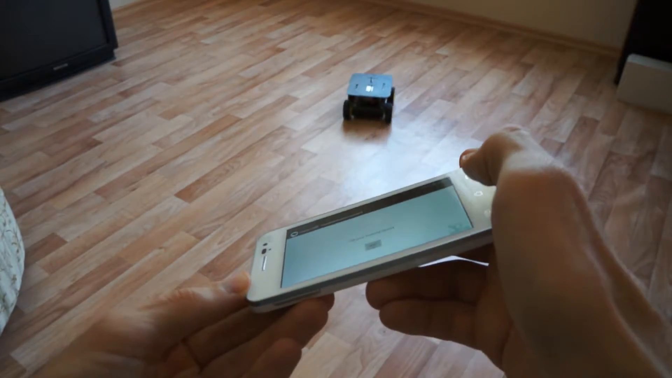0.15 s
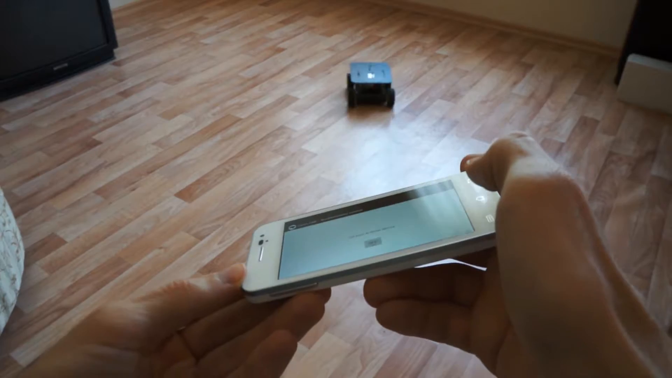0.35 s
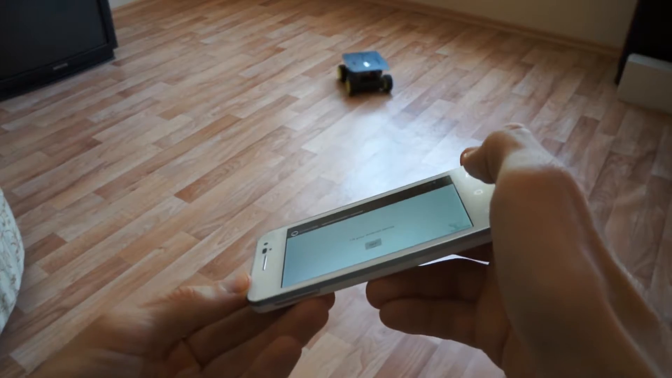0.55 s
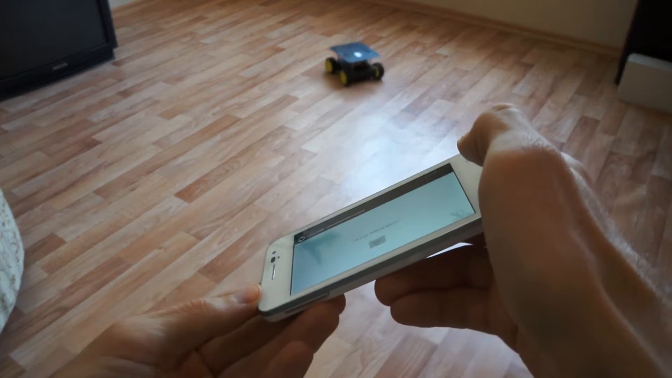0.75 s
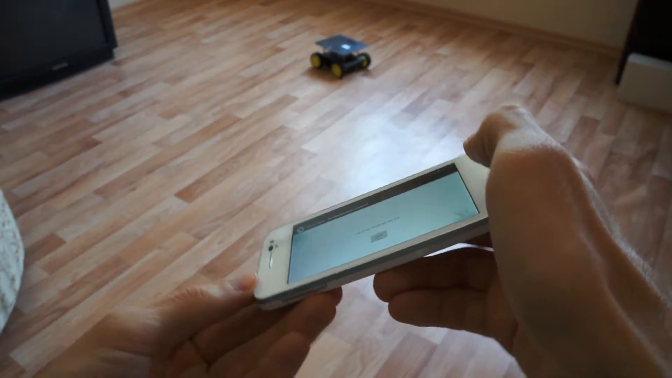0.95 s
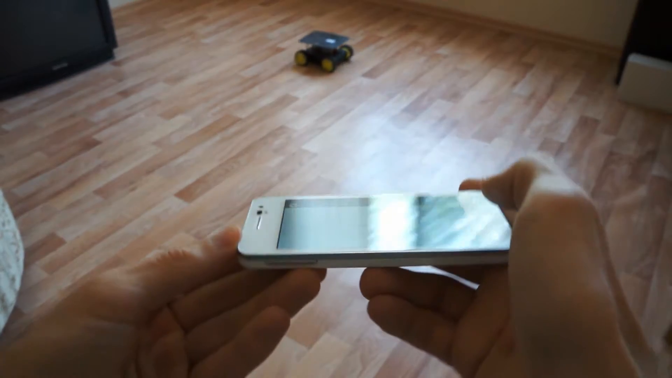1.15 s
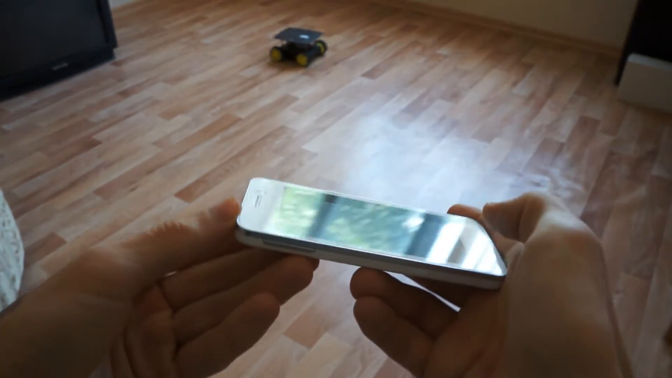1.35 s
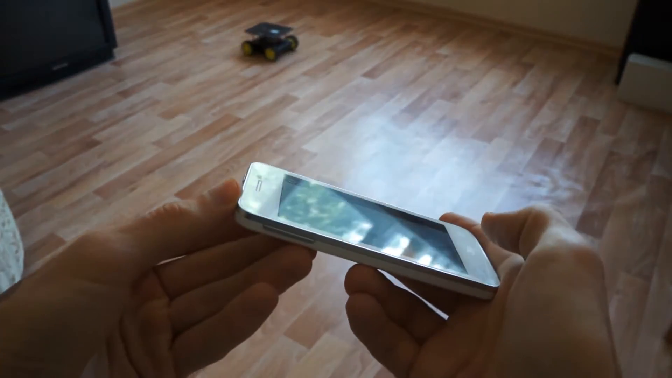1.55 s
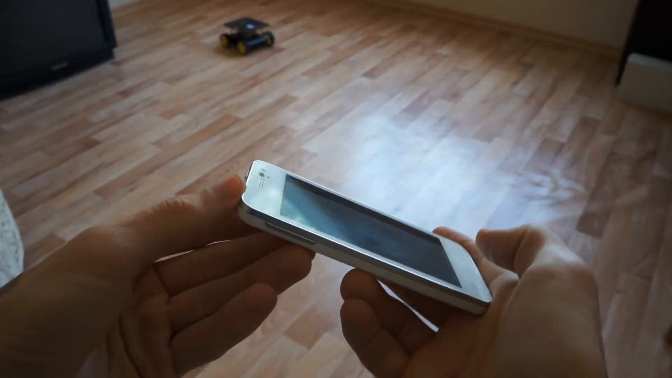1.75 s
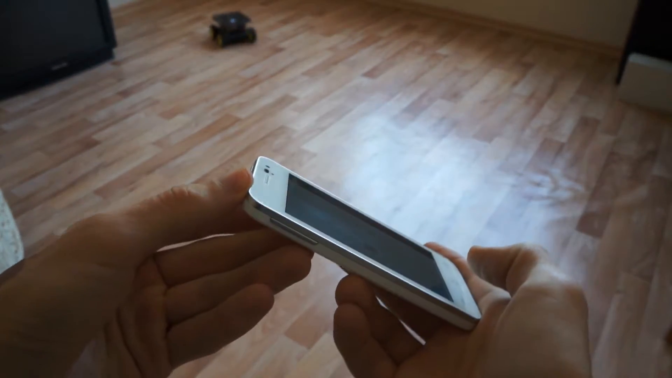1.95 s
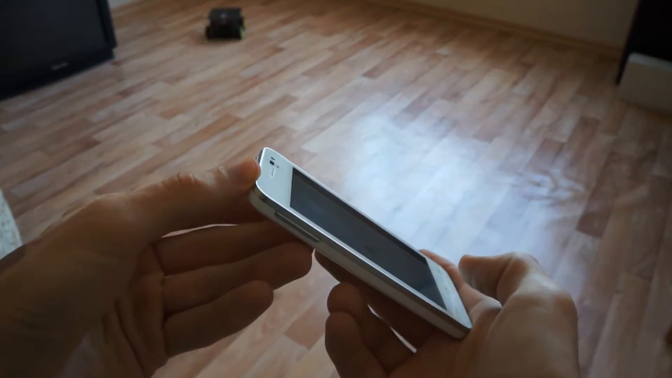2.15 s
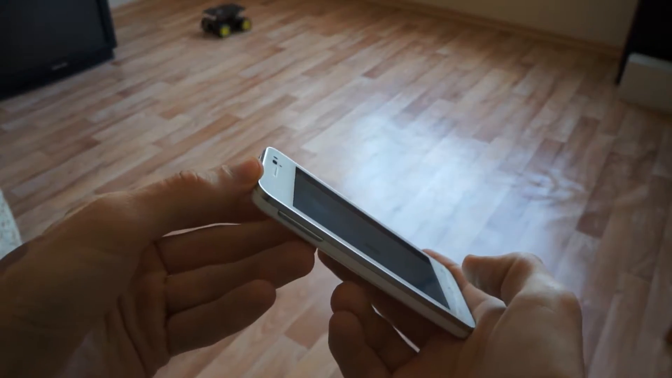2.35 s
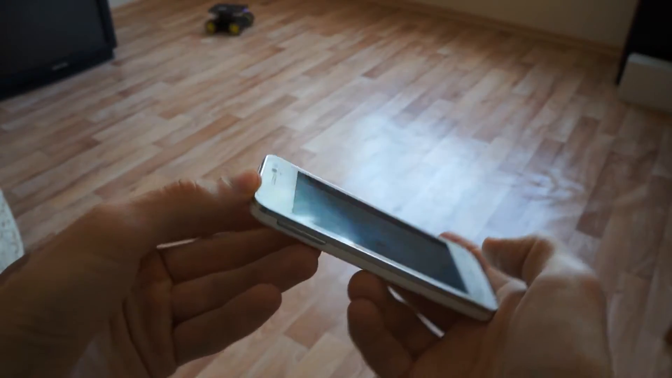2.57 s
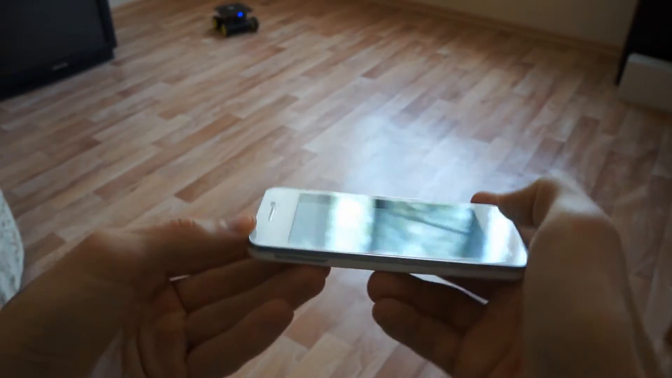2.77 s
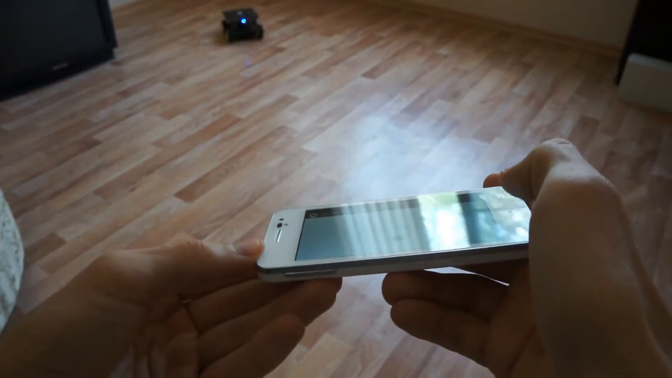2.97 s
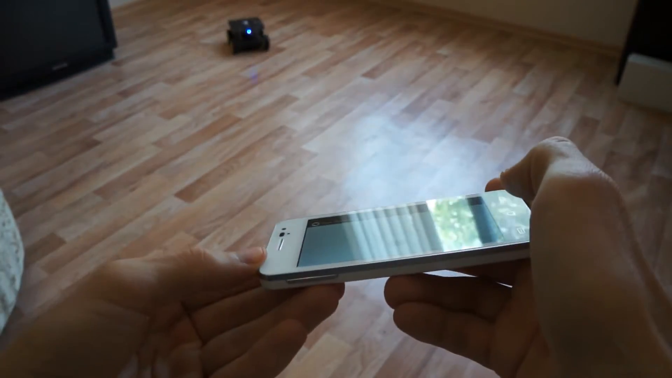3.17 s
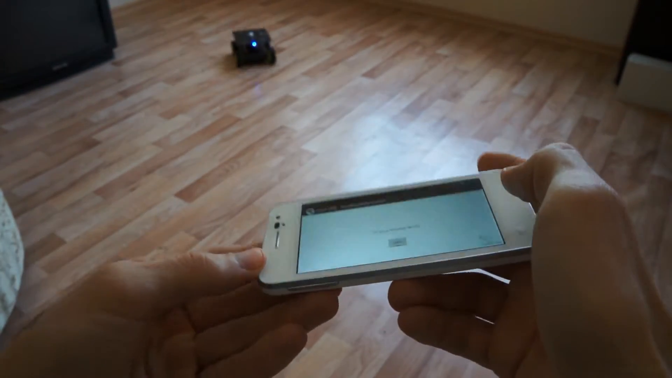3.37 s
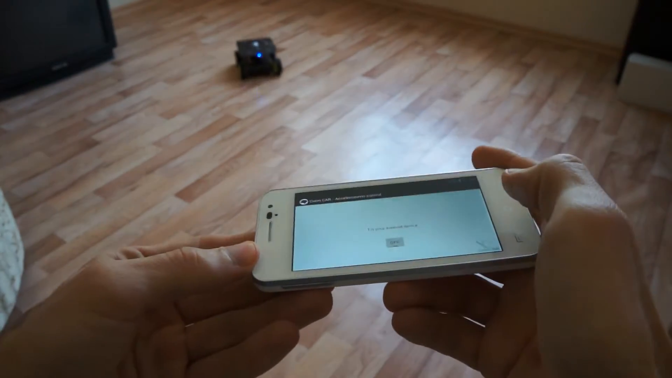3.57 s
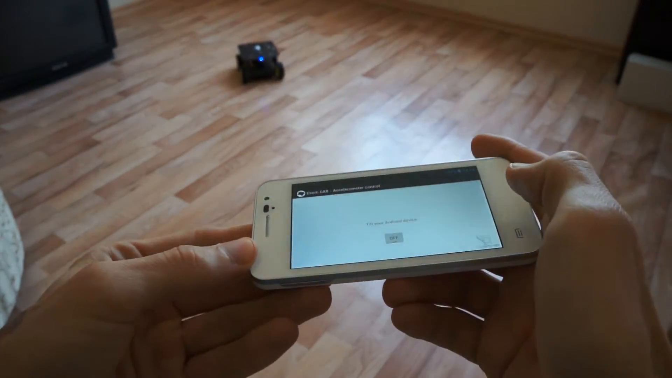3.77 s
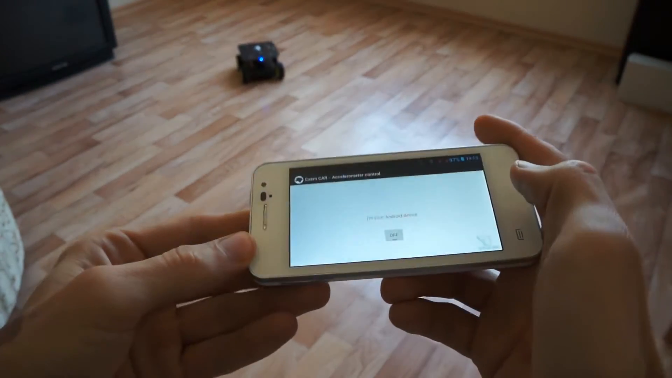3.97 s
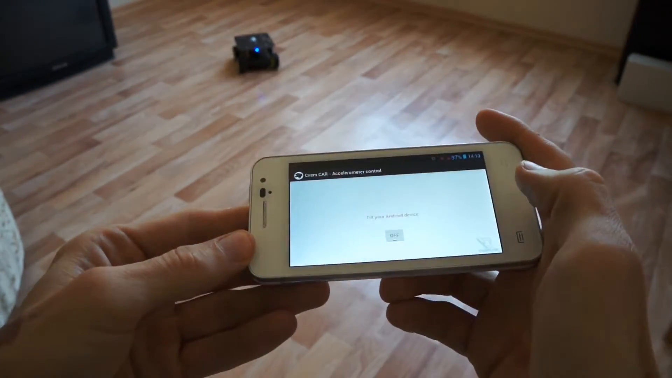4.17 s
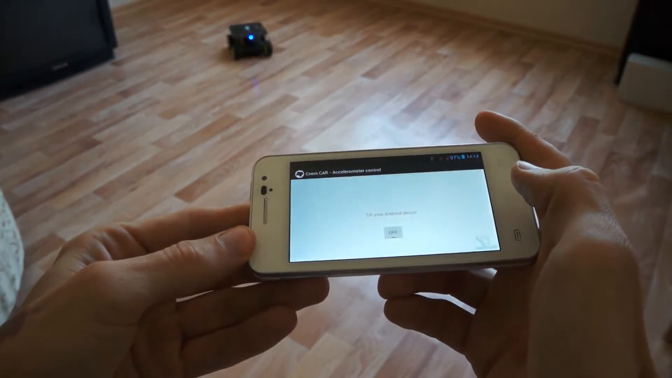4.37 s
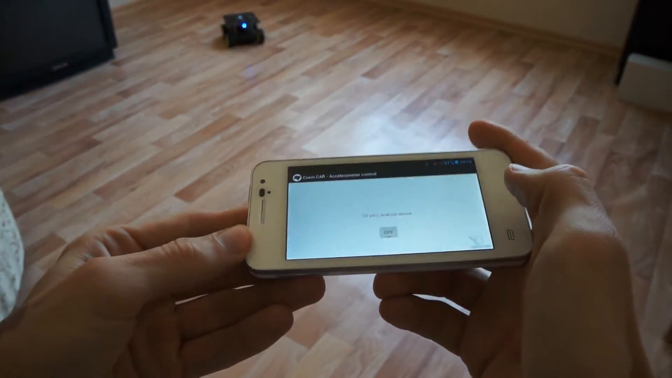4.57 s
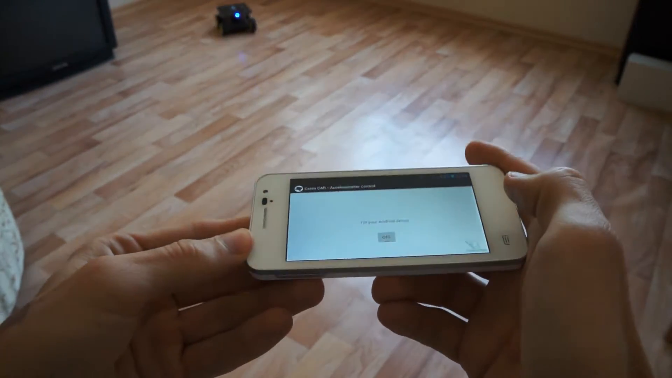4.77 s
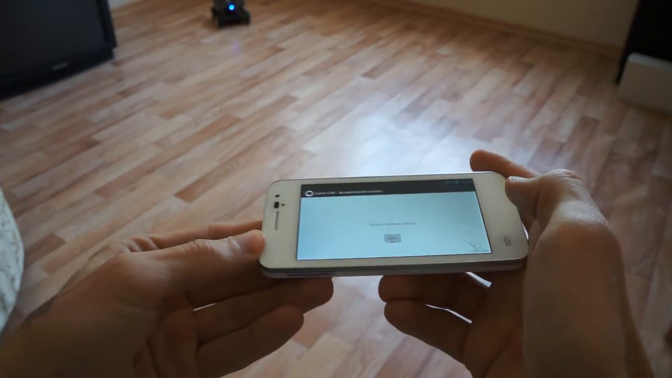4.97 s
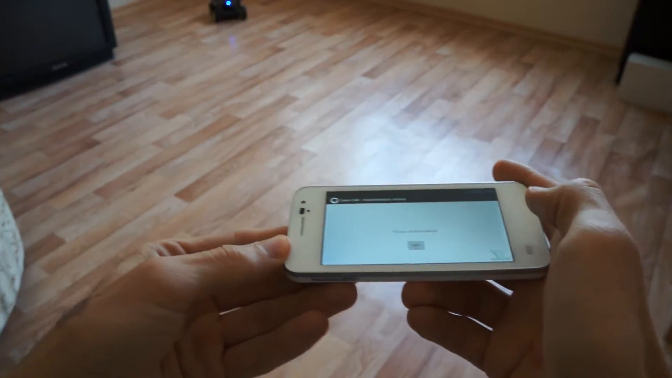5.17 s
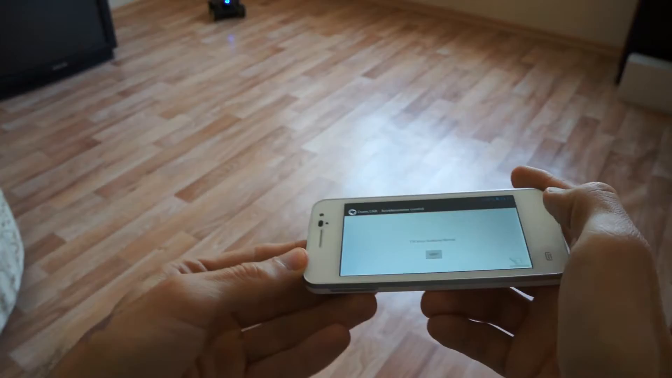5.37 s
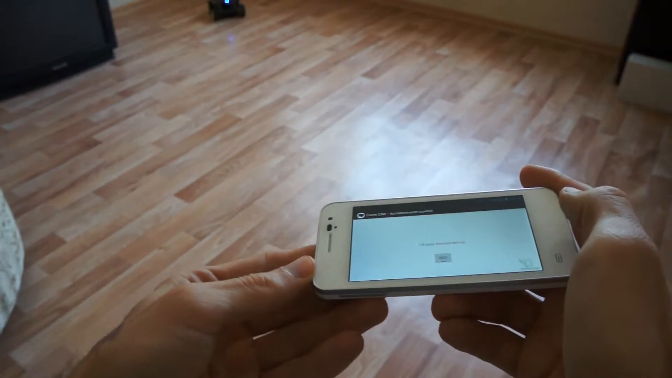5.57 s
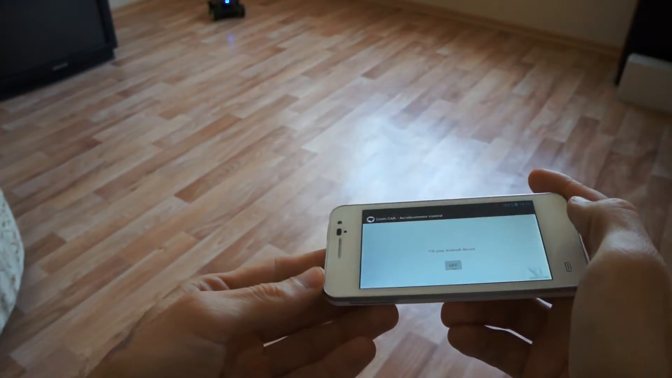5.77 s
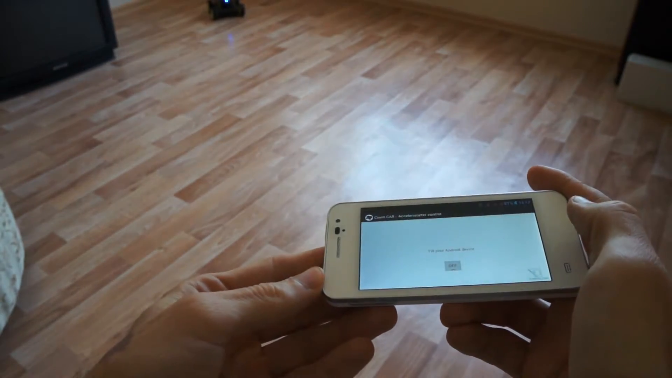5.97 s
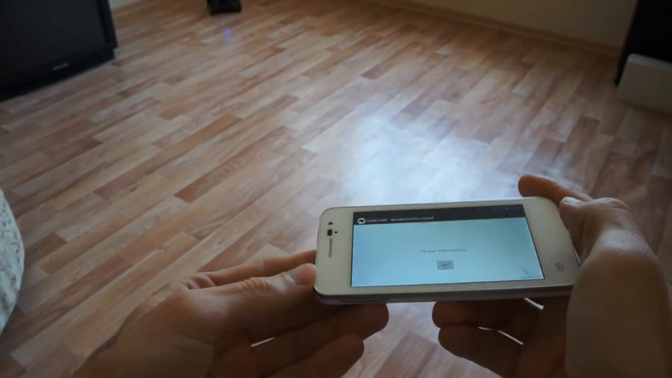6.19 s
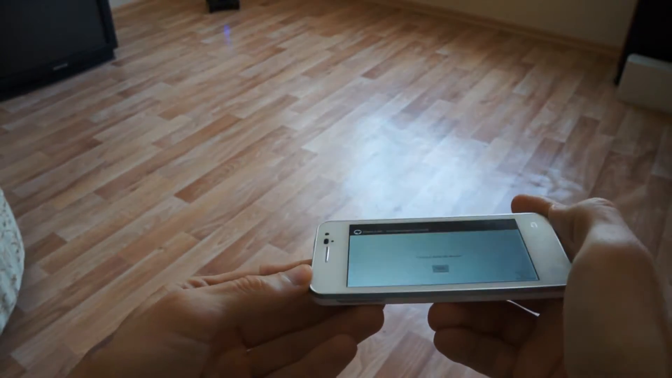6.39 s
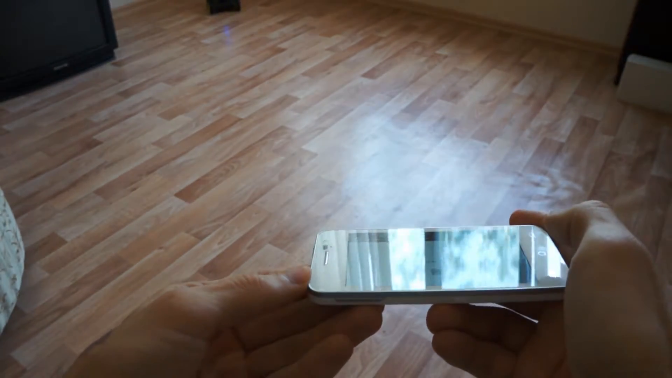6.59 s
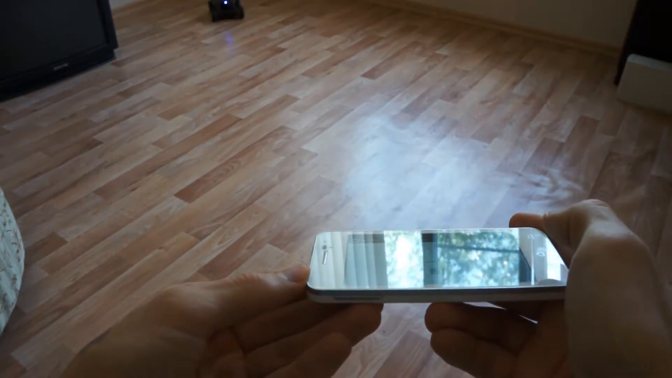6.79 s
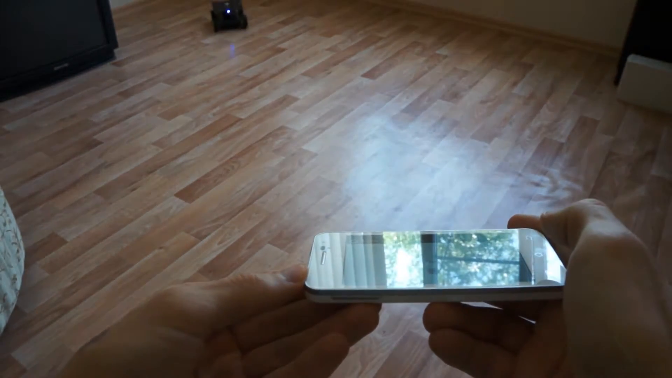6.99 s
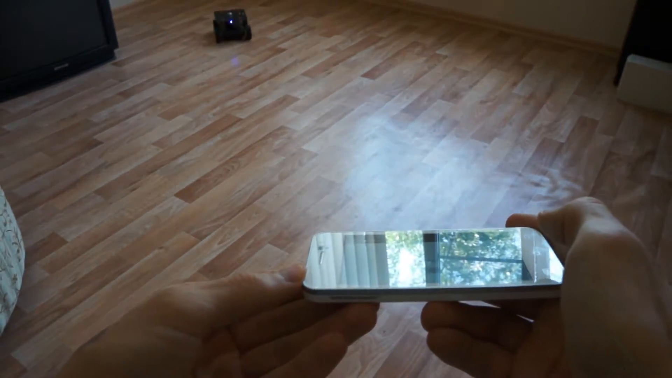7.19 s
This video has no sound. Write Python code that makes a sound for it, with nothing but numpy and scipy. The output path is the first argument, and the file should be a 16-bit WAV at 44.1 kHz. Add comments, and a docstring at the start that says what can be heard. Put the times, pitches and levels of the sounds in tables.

```python
"""A toy car with four small gear motors drives over a hard floor in a quiet room. From the start
each gearbox hums at its tooth-meshing rate, loose plastic gears rattle the resonant chassis and
the wheels rumble. The car stops near 3.5 s, runs again from 4 s and stops once more after 5 s.
Just before 6 s it jolts into motion, and from 6.6 s to the end it is back at full speed.
Throughout, hum and rattle reach two microphone ports directly and as reverberation, over a hush."""
import sys
import numpy as np
from scipy import signal
from scipy.fft import rfft, irfft, next_fast_len
from scipy.io import wavfile
from scipy.ndimage import uniform_filter1d, map_coordinates

SR = 44100
rng = np.random.default_rng(int(sys.argv[2]) if len(sys.argv) > 2 else 0)


def dump_mix(stems):
    """Bounce the given channels to the path in sys.argv[1] as a 16-bit WAV at rate SR."""
    frames = np.atleast_2d(stems).T  # one column per channel
    limited = np.clip(frames, -1, 1)  # hard clip at full scale
    pcm = np.round(limited * 32767).astype(np.int16)
    wavfile.write(sys.argv[1], SR, pcm)


N = 319284


def rattle(level_db, bright_db, clicks_per_s=9000.):
    """Impact excitation: random tooth clicks ring the chassis, louder and brighter at speed."""
    size_db = 3.0 * np.minimum(rng.exponential(1, N), 2.2)
    clicks = (rng.random(N) < clicks_per_s / SR) * rng.choice([-1., 1.], N) * gain_of(size_db)
    pace = np.clip((level_db + 42.0) / 16, 0, 1)  # 0 at a crawl, 1 at full speed
    fast, slow = (unit_rms(filtered(clicks, lambda hz: chassis(hz, p))) for p in (1, 0))
    radiated = directivity(pace * fast + (1 - pace) * slow)
    treble = filtered(radiated, lambda hz: 1 / (1 + (3000 / (hz + 1)) ** 6))
    low_gain = np.sqrt(np.clip(1 - gain_of(2 * bright_db), .02, 1))
    balanced = gain_of(bright_db) * unit_rms(treble) + low_gain * unit_rms(radiated - treble)
    return balanced * gain_of(level_db)


def chassis(hz, pace):
    """Modal resonance: the plastic body's peaks and hollows set the rattle's gain at each frequency."""
    # broad spectrum of the rattle: f/Hz, relative level/dB
    spectrum = [(130, -59), (300, -29), (620, -19.5), (720, -13), (2400, -1.5), (3500, -2), (9000, -2),
                (10500, -10.5), (12300, -21), (13000, -28), (13600, -24.5), (15000, -40.5)]
    # modes (hollows if negative): f/Hz, width/Hz, level at full speed/dB, level at a crawl/dB
    modes = [(654, 120, -4.5, -0.5), (918.5, 112, 11.5, 10.5), (1167, 340, 4, 14), (1483, 210, 7, 10),
             (1900, 260, 5, 6.5), (2405, 210, -4, 3), (2645, 42, 2, 10), (3480, 330, -2.5, 1),
             (4370, 710, 5.5, 4), (4850, 280, 1, 1), (5280, 280, -2.5, -2.5), (5790, 400, 1.5, 11),
             (6870, 1400, -2, 6), (8000, 1000, 3, 5)]
    modes_db = sum((pace * fast + (1 - pace) * slow) / (1 + (2 * (hz - f) / width) ** 2)
                   for f, width, fast, slow in modes)
    return gain_of(at_frequency(spectrum, hz) + modes_db)


def directivity(x, patchy_db=2.6, middle_hz=2300, width_hz=1800):
    """Directional radiation: as the car turns, patches of its spectrum swell and fade."""
    # the middle band thins as the car faces away: t/s, level/dB
    thinning = [(1.2, 0), (1.9, -2.5), (2.7, -1.5), (3.6, 0)]
    hz, t, spectra = signal.stft(x, SR, nperseg=512)
    middle = 1 / (1 + (2 * (hz - middle_hz) / width_hz) ** 4)
    spectra = spectra * gain_of(np.outer(middle, at_time(thinning, t)))
    patches = rng.standard_normal(spectra.shape[::-1]).T
    patches = uniform_filter1d(patches, size=2, axis=0)
    patches = uniform_filter1d(patches, size=14, axis=1)
    return signal.istft(spectra * gain_of(patchy_db * unit_rms(patches)), nperseg=512)[1][:N]


def drive(start_db=-19.5, trail_s=0.049, jolt_s=5.845, jolt_fade_s=0.017):
    """Critically damped step response: the throttle sets the rattle's level and treble share, in dB."""
    # throttle moves: t/s, target level/dB, time constant/s
    throttle = [(0, -22, 0.2), (0.52, -20, 0.091), (0.82, -24.5, 0.17), (1.12, -19.5, 0.046),
                (3.491, -44, 0.12), (3.85, -42.5, 0.12), (3.964, -29, 0.009), (4.041, -19, 0.035),
                (4.85, -30, 0.15), (5.06, -47, 0.15), (5.45, -70.5, 0.072), (5.843, -52.5, 0.0016),
                (5.858, -40.5, 0.017), (5.965, -31.5, .012), (6.1, -27, 0.015), (6.21, -36.5, 0.095),
                (6.42, -43.5, 0.037), (6.5, -30.5, 0.015), (6.57, -19, 0.037)]
    t = np.arange(N) / SR
    aims_db = [start_db] + [row[1] for row in throttle]
    level_db = np.full(N, start_db)
    for (s, aim_db, lag_s), before_db in zip(throttle, aims_db):
        u = np.maximum(t - s, 0) / lag_s
        level_db = level_db + (aim_db - before_db) * (1 - (1 + u) * np.exp(-u))
    # brightness trails the level; a jolt from standstill is briefly bright
    pole = np.exp(-1 / (trail_s * SR))
    trailing_db = signal.lfilter([1 - pole], [1, -pole], level_db - start_db)
    jolt_db = 15 * (t > jolt_s) * np.exp(-np.abs(t - jolt_s) / jolt_fade_s)
    return level_db, np.minimum(-0.62 + 0.1738 * trailing_db + jolt_db, -.3)


def motors(rattle_db):
    """Superposition: the hums of the separate motor runs add, each at its own tooth rate."""
    # one list per run of a motor: t/s, tooth rate f/Hz, fundamental level/dB, octave level/dB
    runs = [
        [(0.0, 405, -43, -49), (0.3, 440.4, -57.5, -52), (0.5, 427, -50, -62), (0.8, 447.8, -56.5, -36),
         (1.13, 405.5, -49, -62), (1.33, 416, -46, -60), (1.39, 447.8, -41.5, -35), (1.6, 463.8, -41, -33.5),
         (1.85, 476.5, -53, -31), (2.0, 472.6, -51, -40), (2.17, 461.8, -41, -31), (2.4, 459, -51, -25.5),
         (2.6, 464.8, -42, -31.5), (2.88, 449, -33.5, -26.5), (2.97, 437.5, -41.5, -37),
         (3.15, 455, -42.5, -39), (3.33, 467, -70, -43), (3.45, 453.2, -46.5, -54), (3.6, 398, -56, -49)],
        [(1.4, 479, -53, -45), (1.6, 495, -48, -40), (1.9, 491, -46, -60), (2.05, 508, -40.5, -43),
         (2.22, 502.5, -40, -40), (2.31, 495, -63, -42), (2.5, 490.5, -42, -40), (2.72, 509.4, -47, -44),
         (3.05, 488, -47, -56), (3.4, 485, -51, -45)],
        [(0.0, 380.5, -43, -44), (0.16, 371, -46.5, -47), (0.45, 347.3, -55, -61), (0.54, 361, -45, -59),
         (0.65, 366.5, -47, -59), (1.05, 355.5, -53, -51), (1.45, 365, -48, -56), (1.65, 341, -59, -76),
         (1.8, 302, -69, -67)],
        [(2.9, 320.5, -60, -59), (3.1, 377.4, -50, -55), (3.3, 392, -57, -62), (3.5, 386, -49.5, -58),
         (3.64, 349.7, -61, -52)],
        [(4.09, 348, -60.5, -70), (4.17, 396, -55, -64), (4.3, 449.4, -45, -36), (4.42, 470.3, -43, -52),
         (4.65, 480, -47, -57), (4.8, 471.3, -46.5, -43), (4.91, 407.7, -39.5, -46),
         (5.02, 405.3, -52.5, -52.5), (5.09, 427, -51, -48), (5.14, 406, -67, -60)],
        [(4.1, 324, -56, -67), (4.2, 361, -53.5, -61), (4.3, 398, -44, -63), (4.5, 405.5, -42.5, -62),
         (4.7, 400.5, -43, -53), (4.9, 362.2, -49.5, -55), (5.13, 323.4, -59, -64)],
        [(6.6, 311.3, -94, -58), (6.7, 377.8, -46.5, -46), (6.9, 469, -44, -33.5), (7.05, 481, -41.5, -34),
         (7.3, 489, -40, -46)],
        [(6.8, 468, -55, -53), (7.0, 507, -45, -60), (7.3, 512.6, -53, -56)],
        [(6.7, 355.3, -48, -47), (6.9, 373.6, -49.5, -56.5), (7.3, 364.4, -55, -73)],
        [(0, 307, -50, -68), (.25, 284, -59, -70)],
    ]
    # lift of the third harmonic in each run: level/dB
    third_lifts = [-3.5, -4, -13, -10.5, 1.5, -6, 0, -10, -20, 1]
    hum = np.zeros(N)
    for run, lift_db in zip(runs, third_lifts):
        add(hum, run[0][0], gearbox(run, rattle_db, lift_db))
    return hum


def gearbox(run, rattle_db, lift_db, waver_hz=.9, flutter_db=2.2, slip_rad=.11, knock_slip_rad=.6):
    """Periodic tooth meshing gives harmonics; each flutters, and tooth errors modulate its phase."""
    # third harmonic: f/Hz, level re rattle/dB
    third_spectrum = [(900, -24), (1100, -25), (1250, -21), (1400, -15), (1530, -17)]
    # its swell as the car turns under load: t/s, level/dB
    third_swell = [(0, 1), (1.3, 3.5), (1.55, 1.5), (1.9, 1), (2.1, -1.5), (2.35, 6.5), (2.55, -15),
                   (2.76, 8.5), (3.05, 5), (3.25, -0.5), (3.42, 3.5), (3.5, 7), (4.15, 7), (4.35, -11),
                   (4.52, 4), (4.7, -1.5), (4.85, 3), (5.0, -3.5), (6.75, 4), (6.95, -1), (7.2, 1)]
    # tooth knocks, strongest in steady circling: t/s, level re rattle/dB
    knocks = [(0, -1), (1.4, -3), (1.7, 1.5), (2.8, 1.5), (3.1, -3), (4.7, -3), (7.2, -2)]
    # their high harmonics: multiple of the tooth rate, level re knocks/dB
    upper_orders = [(4, -24), (5, -27), (6, -22), (8, -18), (9, -21), (10, -17.5), (12, -18), (14, -24),
                    (16, -18), (18, -20)]
    times, *columns = np.transpose(run)
    t = np.arange(times[0], times[-1], 1 / SR)
    hz, fundamental_db, octave_db = (np.interp(t, times, column) for column in columns)
    phase = 2 * np.pi * np.cumsum(hz + waver_hz * drift(len(t), 25.)) / SR
    rattle_db = rattle_db[np.minimum(np.round(t * SR).astype(int), N - 1)]
    glide_hz_per_s = uniform_filter1d(np.gradient(hz) * SR, size=2000)
    strain_db = 3 * np.minimum(abs(glide_hz_per_s) / 500, 1)  # sings out in fast changes of speed
    third_db = rattle_db + lift_db + strain_db
    third_db += at_frequency(third_spectrum, 3 * hz) + at_time(third_swell, t)
    # the teeth knock hard only near full speed
    knock_db = rattle_db + at_time(knocks, t) - .06 * np.maximum(460 - hz, 0)
    orders = [(1, fundamental_db), (2, octave_db), (3, third_db)]
    orders += [(k, knock_db + db) for k, db in upper_orders]
    hum = np.zeros(len(t))
    for k, db in orders:
        amplitude = gain_of(db + flutter_db * drift(len(t), 28.))
        depth_rad = slip_rad * k ** 2 if k <= 3 else knock_slip_rad
        hum += amplitude * np.sin(k * phase + 2 * np.pi * rng.random() + depth_rad * drift(len(t), 45.))
    since_start = t - t[0] + (t[0] == 0)  # a motor already running at t = 0 has no fade-in
    until_end = min(t[-1], N / SR) - t
    fade = np.clip(np.minimum(since_start, until_end) / .03, 0, 1)
    return np.sqrt(2) * hum * fade


def body_rings(rattle_db):
    """Narrow-band resonance: single parts of the body ring out as noise bands that swell and fade."""
    # peak t/s, half duration/s, f/Hz, level re rattle/dB
    rings = [(0.3, 0.99, 4360, -11.5), (0.789, 0.41, 1764, -16), (.82, 0.18, 904, -14),
             (1.498, 0.34, 4230, -8.5), (.97, 0.14, 2900, -14), (1.25, .1, 6700, -14),
             (1.85, 0.25, 4260, -12), (2.144, 0.083, 9000, -19), (3.15, 0.59, 4850, -11),
             (3.35, 0.44, 4320, -15), (3.54, 0.098, 1219, -13.5), (4.062, .05, 1510, -13),
             (4.084, 0.062, 1130, -14), (4.142, 0.054, 910, -16), (4.16, .05, 1493, -11.5),
             (4.166, 0.073, 2610, -14), (4.4, 0.46, 4830, -11), (4.7, .3, 8000, -12),
             (4.853, .07, 890, -11), (5.073, 0.107, 913, -7), (5.28, 0.081, 903, -11),
             (5.3, 0.11, 1540, -12.5), (5.42, 0.13, 1090, -9.5), (5.9, 0.093, 1510, -5.5),
             (5.935, 0.071, 2660, -23), (6.01, 0.057, 1550, -4), (6.09, .14, 1490, -9),
             (6.202, 0.16, 1995, -10), (6.21, 0.13, 6350, -9), (7.15, 0.47, 4350, -11),
             (7.198, 0.11, 5810, -16)]
    out = np.zeros(N)
    for peak_s, half_s, hz, db in rings:
        t = np.arange(0, 2 * half_s, 1 / SR)
        width_hz = 35 + .014 * hz
        band = filtered(rng.standard_normal(len(t)), lambda f: 1 / (1 + (2 * (f - hz) / width_hz) ** 4))
        ring = gain_of(db) * unit_rms(band) * np.sin(np.pi * t / (2 * half_s)) ** 2
        start_s = peak_s - half_s
        add(out, max(start_s, 0), ring[max(round(-start_s * SR), 0):])
    return out * gain_of(rattle_db)


def wheel_rumble(cutoff_hz=190):
    """Structure-borne sound: the rolling wheels send low noise through the floorboards."""
    # t/s, level/dB
    levels = [(0, -72), (1.1, -75), (2.4, -91.5), (2.95, -70), (3.3, -75.5), (3.7, -87)]
    low = filtered(rng.standard_normal(N), lambda hz: hz / (hz + 40) / (1 + (hz / cutoff_hz) ** 4))
    return unit_rms(low) * gain_of(at_time(levels, np.arange(N) / SR))


def room(x, crossfade_hz=0.86175):
    """Reverberation: reflections decay band by band; three tails take turns as the car changes place."""
    # f/Hz, reverberation time T60/s
    decay_times = [(300, 0.92), (1500, 0.1), (5000, 0.23), (12000, 0.17)]
    out, t = np.zeros(N), np.arange(N) / SR
    for k in range(3):
        taps = np.zeros(SR // 2)
        slots = np.arange(100, len(taps) - 20, 20)
        taps[slots + rng.integers(0, 20, len(slots))] = rng.choice([-1., 1.], len(slots))
        hz, delay_s, spectra = signal.stft(taps, SR, nperseg=256)
        decay = gain_of(-60 * delay_s / at_frequency(decay_times, hz)[:, None])
        tail = signal.istft(spectra * decay, SR, nperseg=256)[1]
        weight = np.sqrt(2 / 3) * np.cos(2 * np.pi * crossfade_hz * t + np.pi * k / 3)
        out += signal.oaconvolve(x * weight, tail / np.linalg.norm(tail))[:N]
    return out


def air(hush_db=-63.5, hum_hz=147, hum_db=-82.5):
    """Ambient noise floor: the room's broadband hush with one faint steady tone."""
    # f/Hz, relative level/dB
    spectrum = [(30, -5.5), (60, -11), (110, -11.5), (250, 1), (430, 8), (900, 5.5), (1600, -18),
                (3500, -28), (12000, -12), (15000, -40.5)]
    hush = unit_rms(filtered(rng.standard_normal((2, N)), lambda hz: gain_of(at_frequency(spectrum, hz))))
    hum = np.sqrt(2) * gain_of(hum_db) * np.sin(2 * np.pi * hum_hz * np.arange(N) / SR)
    return ports(*(gain_of(hush_db) * hush)) + hum


def ports(common, difference):
    """Partial coherence: two microphone ports share one sound and differ by another, more in the treble."""
    # f/Hz, left-right coherence for equally strong inputs
    coherence = [(60, 0.44), (130, 1), (400, 1), (800, 0.96), (1500, 0.6), (3000, 0.37), (7000, 0.3),
                 (14000, 0.71)]
    # f/Hz, phase lead of the left port/rad
    phase_lead = [(100, 0), (1500, 0.022), (2500, 0.63), (3600, 1.29), (7700, 1.05), (11000, 0.9)]
    # f/Hz, left minus right level/dB
    balance = [(60, 0.5), (240, 2), (950, -1), (3770, -2.5), (15000, 0.5)]
    size = next_fast_len(N)
    hz = np.fft.rfftfreq(size, 1 / SR)
    alike = np.clip(at_frequency(coherence, hz), 0, 1)
    tilt = gain_of(at_frequency(balance, hz) / 2) * np.exp(.5j * at_frequency(phase_lead, hz))
    mid = np.sqrt((1 + alike) / 2) * rfft(common, size)
    side = np.sqrt((1 - alike) / 2) * rfft(difference, size)
    return irfft(np.array([(mid + side) * tilt, (mid - side) / tilt]), size)[:, :N]


def gain_of(db):
    """Amplitude ratio of a level in decibels."""
    return 10 ** (np.asarray(db) / 20)


def unit_rms(x):
    """Normalisation to rms 1."""
    return x / np.sqrt(np.mean(x ** 2) + 1e-20)


def at_time(points, t):
    """Linear interpolation of a table in time."""
    return np.interp(t, *np.transpose(points))


def at_frequency(points, hz):
    """Interpolation of a table on a log-frequency axis."""
    f, value = np.transpose(points)
    return np.interp(np.log(hz + 1), np.log(f + 1), value)


def add(mix, start_s, sound):
    """Superposition of a sound on the mix from a given time."""
    part = mix[..., round(start_s * SR):][..., :sound.shape[-1]]
    part += sound[..., :part.shape[-1]]


def drift(length, knots_per_s):
    """Smooth random modulation of rms about 1: a spline through Gaussian values."""
    knots = np.arange(0, length / SR * knots_per_s + 2)
    coarse = np.arange(0, length + 64, 64)
    values = rng.standard_normal(len(knots))
    curve = map_coordinates(values, [coarse / SR * knots_per_s], order=3, mode="nearest")
    return np.interp(np.arange(length), coarse, curve)


def filtered(x, gain):
    """Zero-phase filtering by a gain given as a function of frequency."""
    size = next_fast_len(x.shape[-1])
    return irfft(rfft(x, size) * gain(np.fft.rfftfreq(size, 1 / SR)), size)[..., :x.shape[-1]]


def scene():
    """Direct and reverberant fields of the car add at the ports, over rumble and hush."""
    level_db, bright_db = drive()
    # the gear rattle is partly shared by both ports and partly different, so it sounds wide
    common_rattle, difference_rattle = rattle(level_db, bright_db), rattle(level_db, bright_db)
    tones = motors(level_db) + body_rings(level_db)
    flutter = gain_of(0.44 * drift(N, 8.3))  # the load shifts over the boards
    common = tones + flutter * common_rattle + gain_of(-9) * room(tones + common_rattle)
    difference = flutter * difference_rattle
    difference += room(gain_of(-4.0) * tones + gain_of(-21.0) * difference_rattle)
    return ports(common + wheel_rumble(), difference) + air()


def record(dry, cutoff_hz=15100):
    """Band limiting: a steep linear-phase low-pass removes the highest treble."""
    low_pass = signal.firwin(511, cutoff_hz, window=("kaiser", 9), fs=SR)
    return signal.oaconvolve(dry, low_pass[None], "same")


dry = scene()
out = record(dry)
dump_mix(out)
```